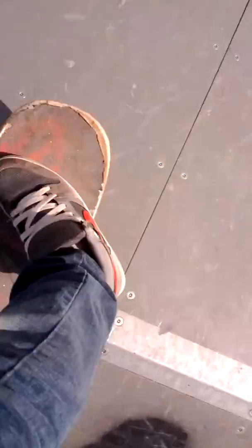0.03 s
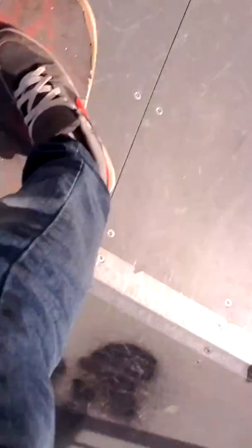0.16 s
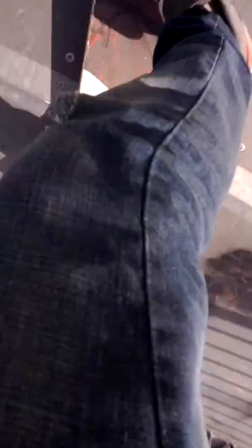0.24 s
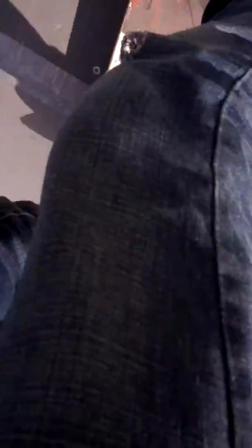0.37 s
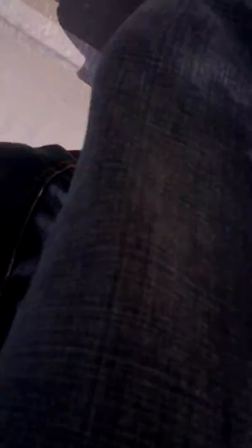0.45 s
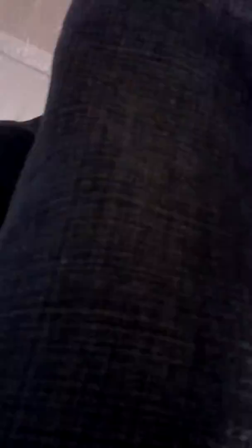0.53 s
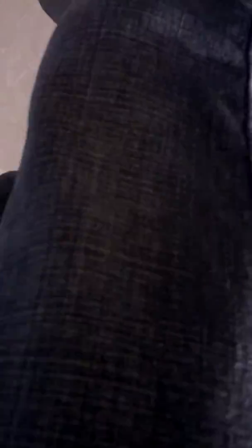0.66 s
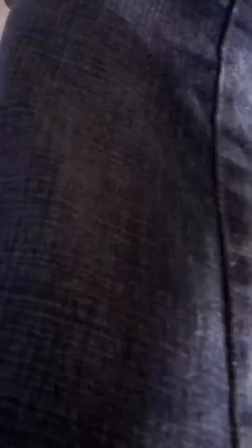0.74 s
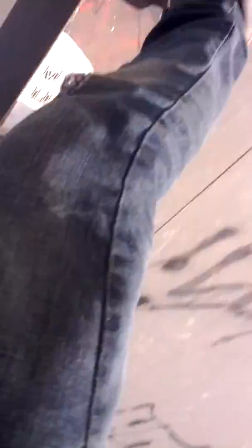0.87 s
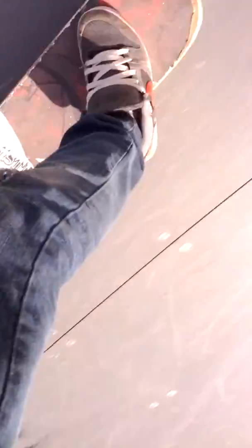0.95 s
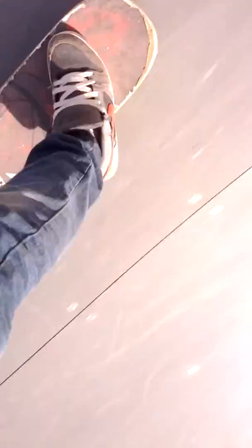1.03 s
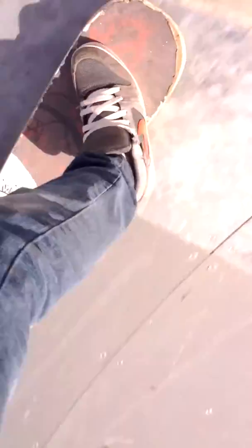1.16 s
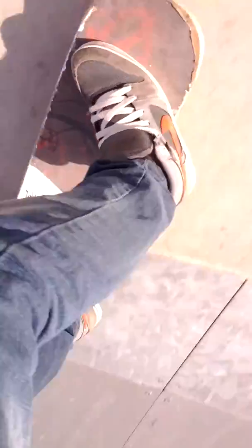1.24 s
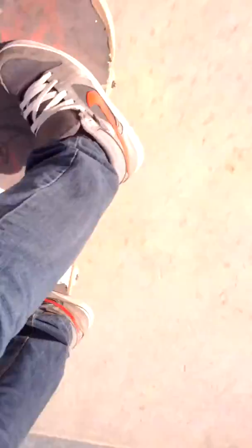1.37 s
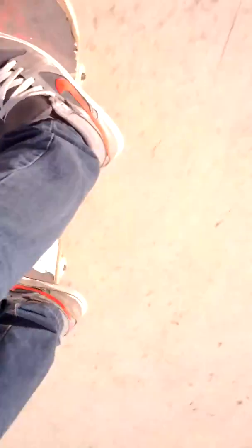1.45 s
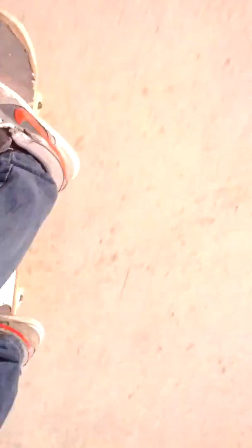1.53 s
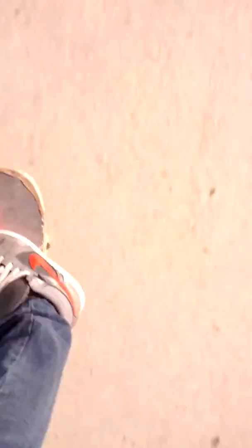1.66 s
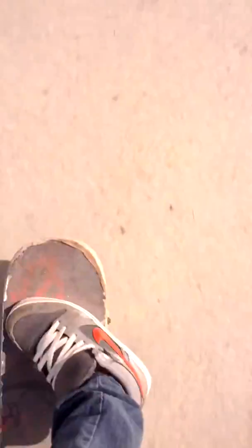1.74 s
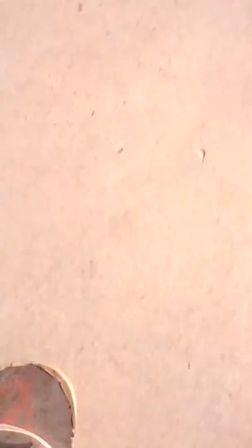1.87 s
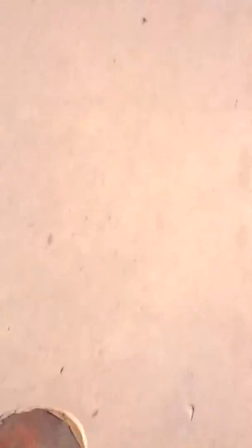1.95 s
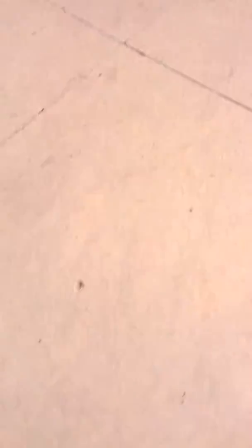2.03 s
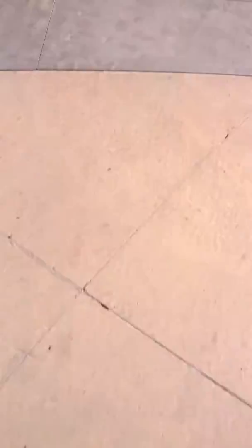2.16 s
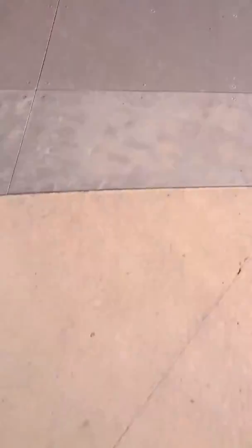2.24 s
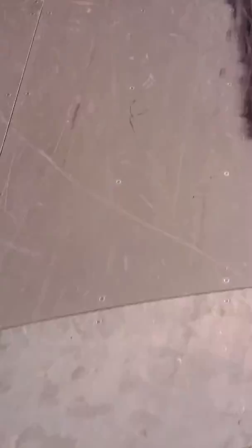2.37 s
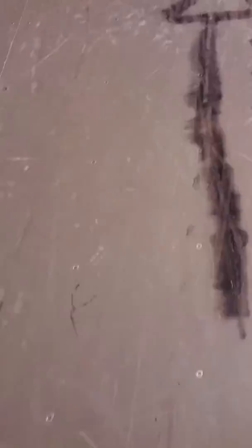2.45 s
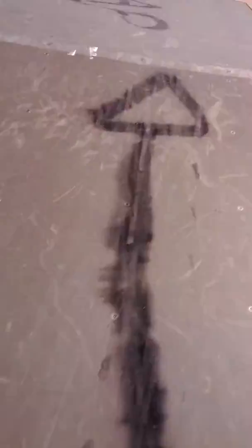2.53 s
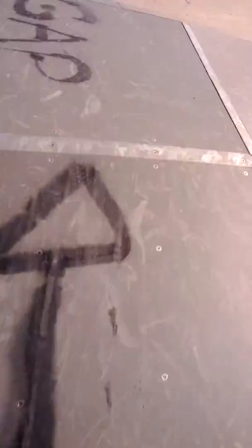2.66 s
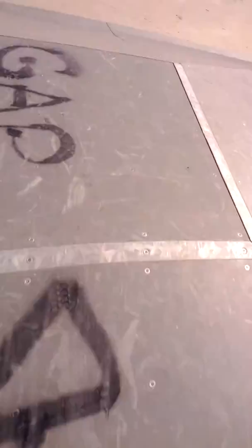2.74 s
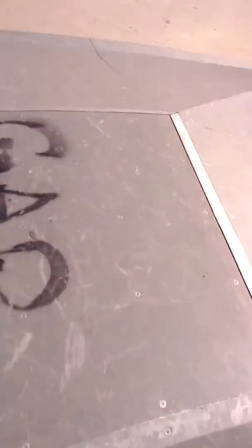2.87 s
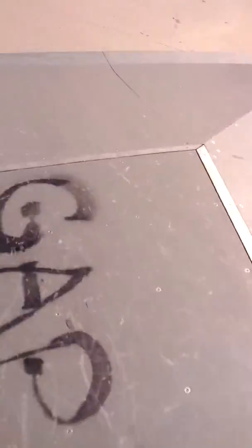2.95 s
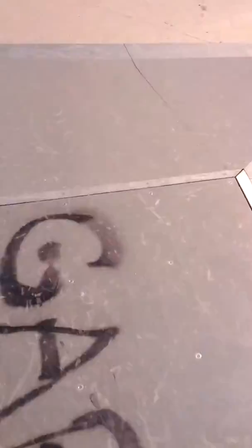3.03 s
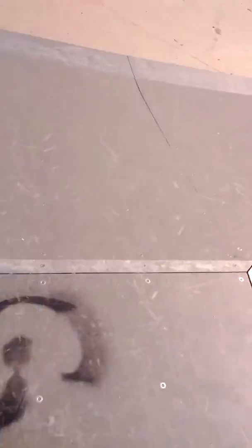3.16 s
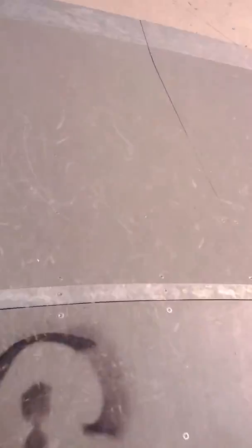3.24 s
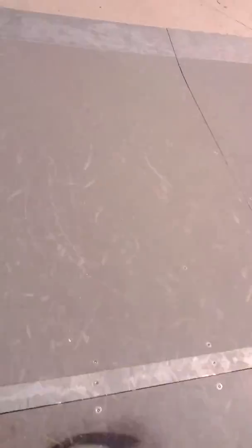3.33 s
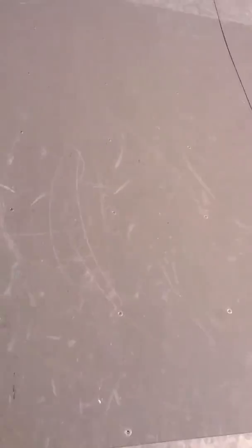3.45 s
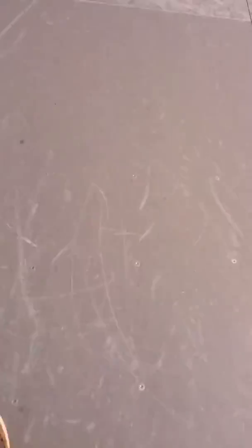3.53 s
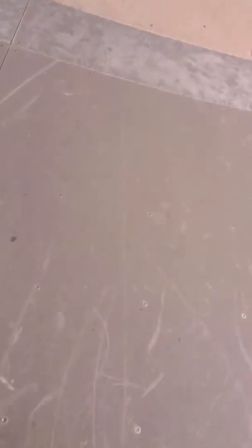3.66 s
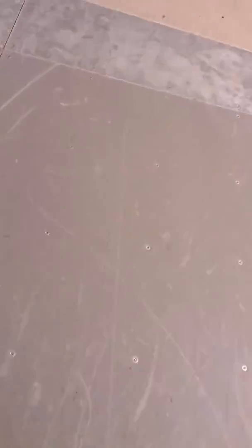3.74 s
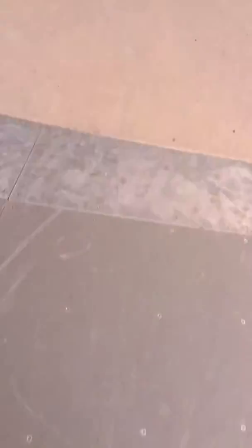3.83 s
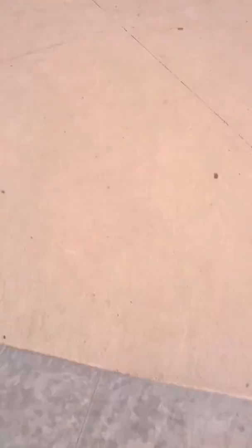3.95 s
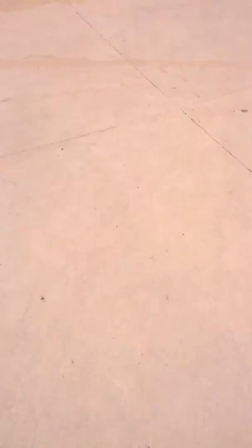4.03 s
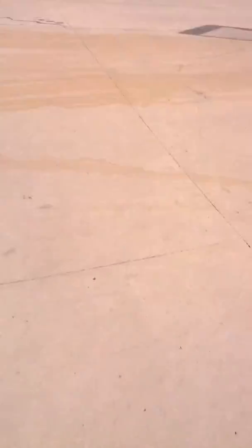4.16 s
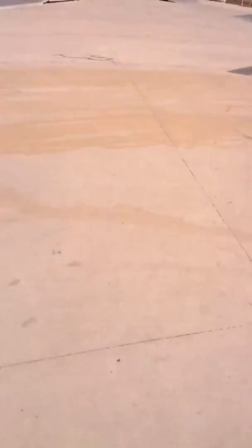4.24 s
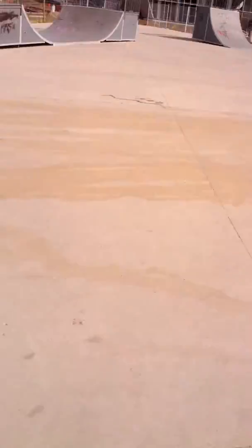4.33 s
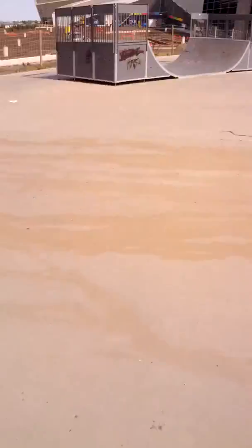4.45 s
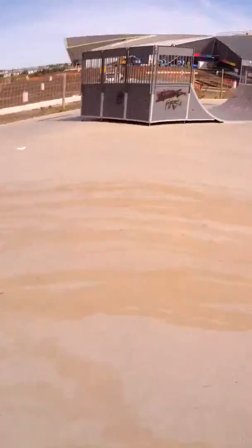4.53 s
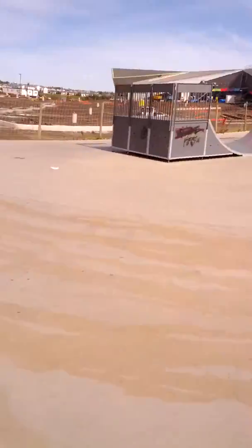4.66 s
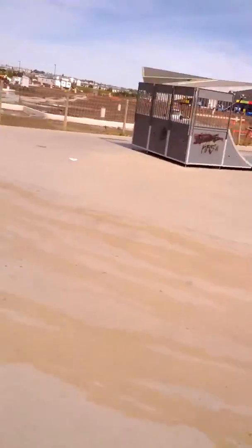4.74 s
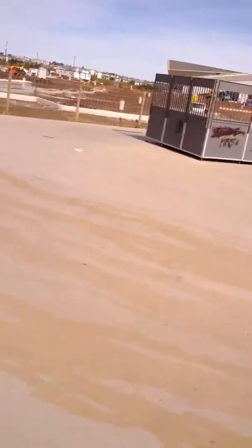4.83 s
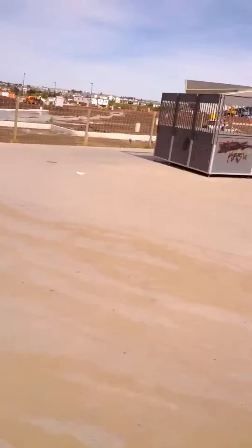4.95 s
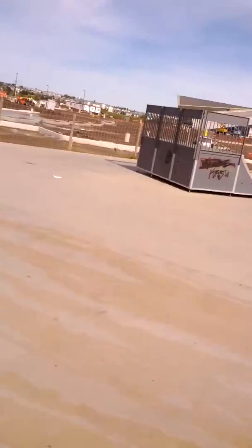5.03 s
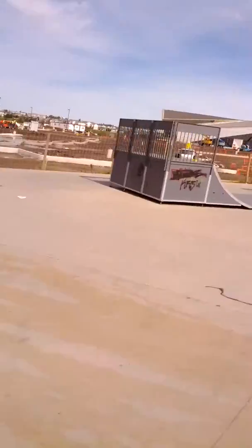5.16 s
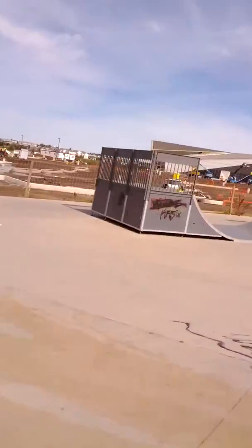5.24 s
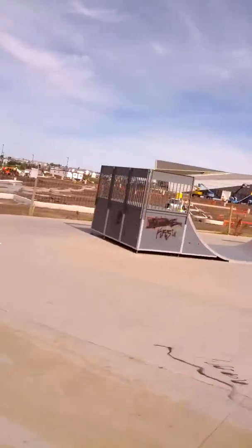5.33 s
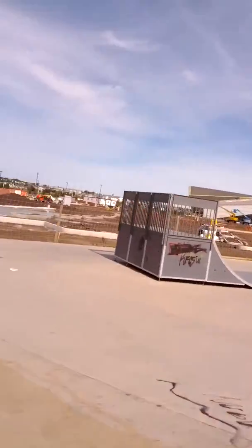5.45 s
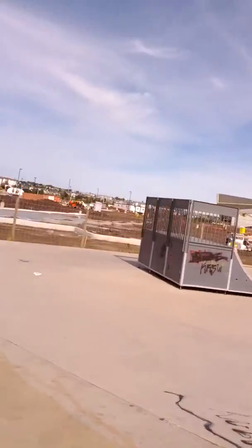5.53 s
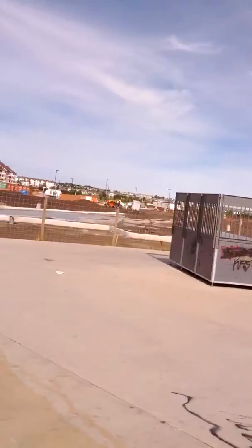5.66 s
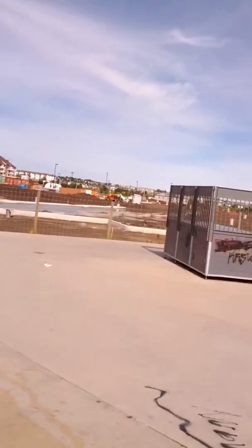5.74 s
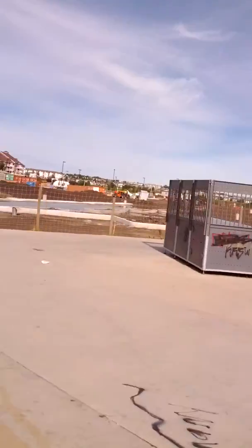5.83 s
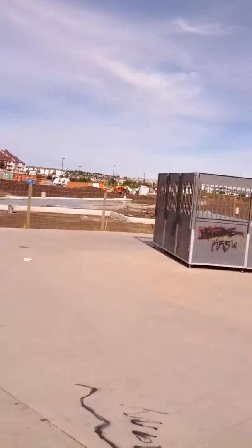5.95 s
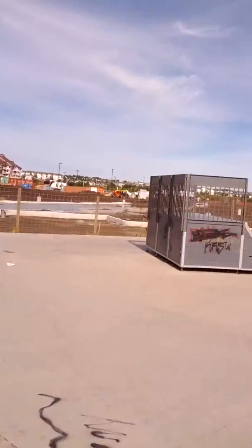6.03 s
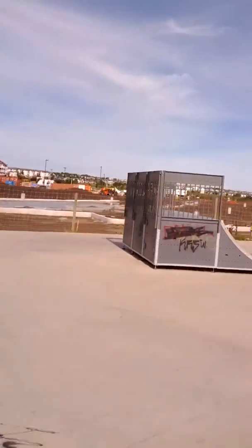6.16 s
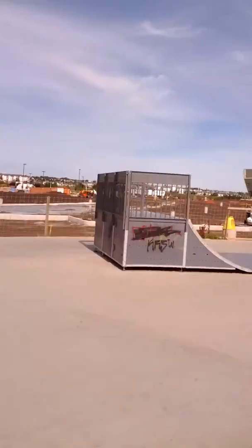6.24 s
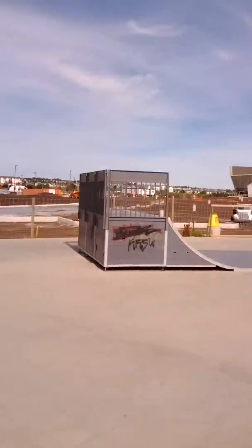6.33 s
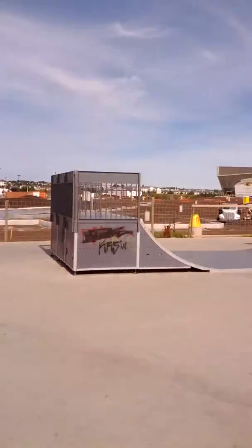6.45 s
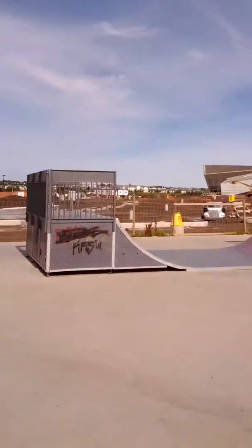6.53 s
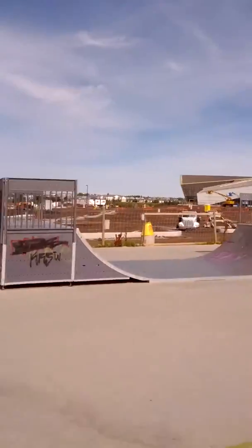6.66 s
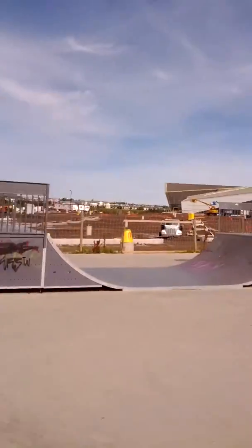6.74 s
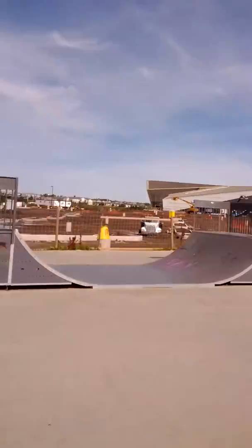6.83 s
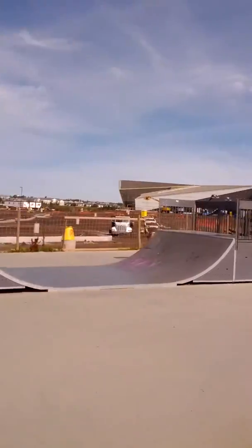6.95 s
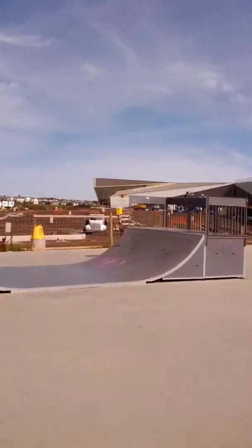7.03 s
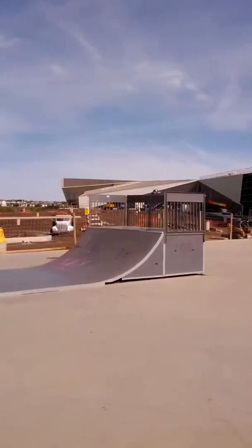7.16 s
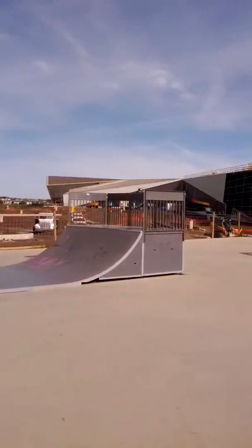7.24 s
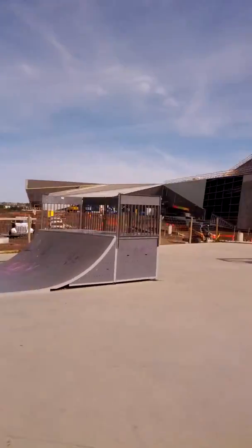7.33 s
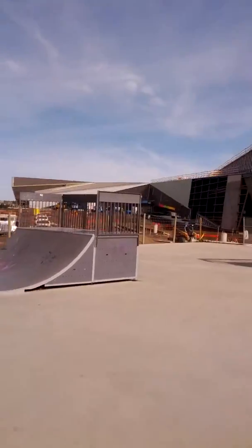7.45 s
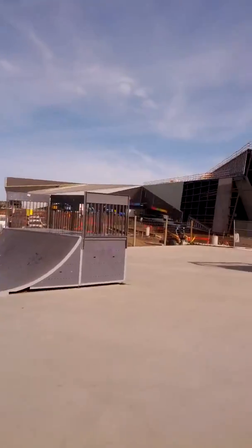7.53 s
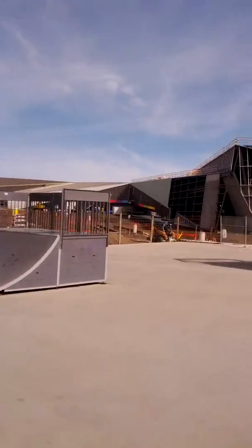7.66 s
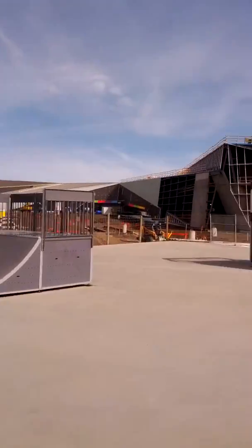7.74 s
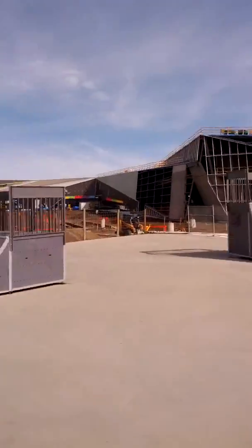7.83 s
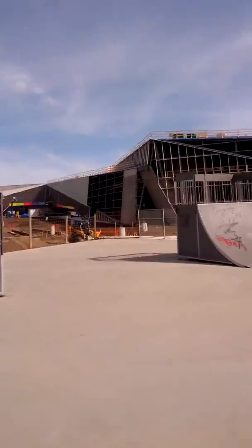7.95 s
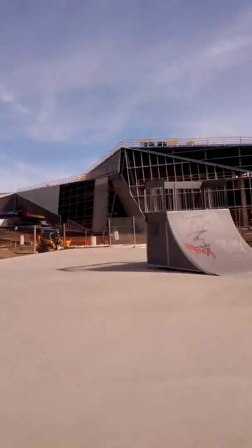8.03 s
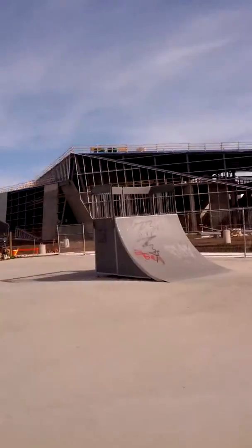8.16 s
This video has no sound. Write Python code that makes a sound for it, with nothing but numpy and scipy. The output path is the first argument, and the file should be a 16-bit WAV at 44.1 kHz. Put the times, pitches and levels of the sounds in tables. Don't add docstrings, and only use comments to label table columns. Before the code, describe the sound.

Close and handheld outdoors, a skateboard starts softly with a shoe scuff, then rumbles and booms down a hollow ramp. Distorted cracks mark its foot, followed by pebbly patter and a bright steel-plate clatter. A lighter box-ramp roll ends in a hard landing; the hiss gradually thins on concrete, broken by small knocks and two late seam clacks.

```python
import sys
import numpy as np
from scipy import signal
from scipy.fft import rfft, irfft
from scipy.io import wavfile
from scipy.ndimage import uniform_filter1d

SR = 44100
rng = np.random.default_rng(int(sys.argv[2]) if len(sys.argv) > 2 else 0)


def field_ratio(decibels):
    return 10 ** (np.asarray(decibels, dtype=float) / 20)


def generate_wav(sig):
    pcm = np.round(np.clip(np.atleast_2d(sig).T, -1, 1) * 32767).astype(np.int16)
    wavfile.write(sys.argv[1], SR, pcm)


N = 361179


def evened(x):
    return x / np.sqrt(np.mean(x ** 2) + 1e-20)


def add(mix, start_s, sound):
    part = mix[round(start_s * SR):][:len(sound)]
    part += sound[:len(part)]


def curves(rows):
    time_s, *columns = np.transpose(rows)
    return [np.interp(np.arange(N) / SR, time_s, column) for column in columns]


def humps(rows):
    t = np.arange(0, N + 64, 64) / SR
    level_db = sum(db * np.exp(-((t - centre_s) / half_s) ** 4) for centre_s, half_s, db in rows)
    return np.interp(np.arange(N) / SR, t, level_db)


def louder(rows, gain_db):
    return [(start_s, level_db + gain_db, *tone) for start_s, level_db, *tone in rows]


def colour(x, points):
    hz = np.fft.rfftfreq(len(x), 1 / SR)
    point_hz, point_db = np.transpose(points)
    gain_db = np.interp(np.log(hz + 1), np.log(point_hz + 1), point_db, -90, -90)
    return evened(irfft(rfft(x) * field_ratio(gain_db), len(x)))


def ring(x, modes):
    out = 0
    for k, (hz, width_hz, level_db) in enumerate(modes):
        b, a = signal.iirpeak(hz, hz / (2.0 * width_hz), SR)
        mode = signal.lfilter(b, a, signal.lfilter(b, a, x))
        out = out + (-1) ** k * field_ratio(level_db) * evened(mode)
    return evened(out)


def wander(seconds):
    width = max(round(seconds * SR), 2)
    return evened(uniform_filter1d(uniform_filter1d(rng.standard_normal(N), width), width))


def blend(share, a, b):
    turn = np.clip(share, 0, 1) * np.pi / 2
    return np.cos(turn) * a + np.sin(turn) * b


def patchy(x, depth_db):
    z = signal.stft(x, nperseg=512)[2]
    chance = uniform_filter1d(rng.standard_normal(z.shape), 7, 0)
    patches = evened(uniform_filter1d(chance, 16, 1))
    return evened(signal.istft(z * field_ratio(depth_db * patches), nperseg=512)[1][:N])


def ground(per_s, spread_db, bumpy_db):
    grains = (rng.random(N) < per_s / SR) * field_ratio(spread_db * np.minimum(rng.exponential(1, N), 4))
    texture = rng.standard_normal(N) * (1 + .5 * evened(grains))
    return evened(texture * field_ratio(bumpy_db * wander(0.0098)))


# time_s, wheel_load_db, roughness_db, hollow_panel_0_1, mic_near_board_0_1
RIDE = [(0, -51, 2.5, 0.1, 0.95), (.29, -47, 4, 0.06, 0.24), (.41, -37, -1, 0.13, 0.4),
        (.66, -28, -1, 0.64, 0.4), (.86, -26.5, 4.5, 0.78, 0.47), (1.19, -24.5, 8.5, 0.7, 0.75),
        (1.46, -21, 0.5, 0.16, 0.88), (1.82, -22.5, 3, 0.25, 0.94), (2.05, -25.5, 3, 0.45, 1),
        (2.44, -28, 9.5, 0.04, 0.55), (2.6, -27.5, 3, 0.76, 1), (2.9, -31.5, 0, 0.7, 1),
        (3.5, -33, -4, 0.55, 0.85), (3.85, -32, -1, 0.5, 0.63), (4.17, -36.5, 9.5, 0.95, 0.52),
        (4.33, -34, 12.5, 0.18, 0.27), (4.7, -34.5, 4.5, 0.23, 0.28), (8.19, -35, 4.5, 0.48, 0.25)]
# centre_s, half_length_s, level_db
ROUGH = [
    (1.91, 0.1, 5),
    (2.1, 0.052, 0.5),
    (4.4, 0.026, 6.5),
    (7.4, 0.28, -1),
    (3, 0.19, -0.5),
    (6.85, 0.24, -3),
    (2.33, 0.16, 0.5),
    (4.39, .055, -7),
    (.8, .15, -1),
]
# centre_s, half_length_s, level_db
LIFTS = [
    (3.073, 0.059, -7.5),
    (3.147, 0.018, -10.5),
    (3.626, 0.092, -5.5),
    (.44, .03, 1.5),
    (2.5, .09, 2.5),
    (.2, .1, -2),
    (3.11, .012, -6),
]
# pitch_hz, width_hz, level_db
DECK_CONCRETE = [(283.3, 42.5, -4.5), (326, 70, -2.5), (560, 116, 1), (727, 88, -3), (1071, 24, -15.5)]
DECK_RAMP = [(184.4, 41, -3), (279, 91, 0.5), (352, 64, -7), (500, 188, 1), (794, 52, -13.5),
             (920, 160, -13)]
# pitch_hz, width_hz, level_db
WHEEL_FAR = [(1282, 160, 3), (1682, 104, -1), (1930, 490, -10.5), (2545, 260, -11), (3160, 190, -17.5),
             (4400, 1500, -22.5)]
WHEEL_NEAR = [(903, 104, 5.5), (1182, 18, -6.5), (1445, 79, 4), (1660, 800, -0.5), (2144, 520, -0.5),
              (2575, 290, -7), (3320, 680, -19)]
WHEEL_PANEL = [(1213, 58, 0), (1533, 137, 2), (1570, 350, -4.5), (2630, 160, -13.5)]
# pitch_hz, level_db_per_hz
GRIT_FAR = [(2060, -4.5), (3800, -5), (5140, -15), (7900, -18), (11300, -16.5), (12900, -23), (15500, -13),
            (16200, -24)]
GRIT_NEAR = [(2060, -0.5), (3500, -1), (4500, -9), (9330, -11.5), (10900, -8.5), (13700, -11.5),
             (15100, -6), (16200, -13)]
# pitch_hz, level_db
SHADING = [(4300, 0), (4950, 4), (5250, 0.5), (7400, 1), (7900, -1), (11700, 0), (12100, -1.5), (14200, -2)]


def rolling():
    load_db, rough_db, hollow, near = curves(RIDE)
    cruise_db, coast_db_per_s, coast_start_s = -34.5, -1.55, 4.7
    coast_db = coast_db_per_s * np.maximum(np.arange(N) / SR - coast_start_s, 0)
    lift_db = humps(LIFTS)
    grit_db = -53 + 0.99 * (load_db - cruise_db) + 0.84 * rough_db + 9.5 * (near - .2) + coast_db
    low, mid, high = ground(400, 0.82, 0.91), ground(600, 1.8, 0.57), ground(500, 0.71, 0.16)
    deck = blend(hollow, ring(low, DECK_CONCRETE), ring(ground(200, 2.0, 2.1), DECK_RAMP))
    wheel = blend(near, ring(mid, WHEEL_FAR), ring(mid[::-1], WHEEL_NEAR))
    wheel = blend(hollow ** 2, wheel, ring(np.roll(mid, SR), WHEEL_PANEL))
    wheel = patchy(wheel, 1.35)
    grit = patchy(blend(near, colour(high, GRIT_FAR), colour(high[::-1], GRIT_NEAR)), 1.44)
    grit = colour(grit, [(1000, 0)] + SHADING + [(17000, 0)])
    out = field_ratio(load_db + rough_db + humps(ROUGH)) * deck
    out += field_ratio(load_db - 1.5 + 1.04 * lift_db) * wheel
    return out + field_ratio(grit_db + lift_db) * grit


# centre_s, half_length_s, level_db
GUSTS = [(.25, 0.098, -4), (.07, 0.087, -6), (.8, 0.2, 11.5), (1.15, 0.13, 15), (1.6, 0.41, 5.5),
         (2.2, 0.37, -3), (2.55, 0.13, 8), (2.99, 0.18, 3), (3.45, 0.2, 4.5), (3.65, 0.093, -5),
         (3.88, 0.17, 5.5), (4.15, 0.026, 12.5), (4.7, 0.58, 4.5), (5.6, 0.18, 4), (5.82, 0.13, 8),
         (6.3, 0.12, 7.5), (6.65, 0.052, -6), (7.14, 0.063, 9), (7.9, 0.105, 4.5)]
# pitch_hz, level_db_per_hz
BUFFET = [(8.8, -31), (15, -3.5), (48, 4), (113, -1), (200, -10), (260, -7.5), (340, -47), (570, -120)]


def wind():
    wind_db = -34 + humps(GUSTS) + 0.81 * wander(0.035)
    return field_ratio(wind_db) * colour(rng.standard_normal(N), BUFFET)


# start_s, level_db, pitch_hz, t60_s
BOOMS = [(0.054, -13, 61.4, 0.036), (0.655, -9.5, 155, 0.039), (0.711, -12.5, 156.6, 0.2),
         (0.753, -11, 119, 0.11), (0.791, -10, 139.6, 0.11), (0.891, -12, 130, 0.11),
         (1.122, -3, 157, 0.29), (1.201, -14, 130.3, 0.46), (2.511, -23, 118, 0.82),
         (2.979, -18, 114.7, 0.36), (3.13, -40, 117, 0.24), (3.496, -17, 117, 0.13)]


def booms():
    out, t = np.zeros(N), np.arange(SR // 2) / SR
    for start_s, level_db, pitch_hz, t60_s in BOOMS:
        add(out, start_s, field_ratio(level_db - 60 * t / t60_s) * np.sin(2 * np.pi * pitch_hz * t))
    return out


# centre_s, length_s, level_db
SHUFFLES = [
    (.06, 0.026, -61),
    (0.212, .02, -55.5),
    (.295, .008, -58),
]
# pitch_hz, level_db_per_hz
SHUFFLE_COLOUR = [(4000, -10), (5500, -5), (9000, -9), (13500, 0), (16500, 0)]


def shuffles():
    t = np.arange(N) / SR
    swell = sum(field_ratio(level_db) * np.exp(-((t - centre_s) / length_s) ** 2)
                for centre_s, length_s, level_db in SHUFFLES)
    return swell * colour(ground(300, 3.5, 2.5), SHUFFLE_COLOUR)


# start_s, level_db, mid_over_level_db, brightness_db_per_octave
TICKS = [(0.309, -31, 5, 8), (.3361, -45, -2, -3), (.363, -45, -3, -8), (1.088, -15, 3, -4),
         (1.122, -7, 4, 4), (1.1367, -10, 6, -1), (1.224, -15, -9, -11), (1.238, -19, 0, -8),
         (1.541, -23.5, 2, -7), (1.569, -19, 4, -8), (2.0917, -15, -17, 0), (2.2404, -19.5, -7, 2),
         (2.4423, -9, -6, 7), (2.454, -11, -2, 5), (2.4784, -27, -3, -3), (2.5016, -16, -16, 7),
         (2.5927, -24, -2, -1), (2.9352, -25.5, 11, 4), (2.9714, -15, 3.5, 4), (3.123, -33.5, 12, 4),
         (3.258, -15, -28, 1), (3.724, -19.5, 3.5, 12), (4.133, -26, -2, 6), (4.1497, -19, 6, 3),
         (4.4942, -12, -26, -4), (5.0133, -39, 12, -11), (5.241, -36, 9, -25), (5.7948, -45, 19, -9),
         (6.636, -26.5, 16, -3), (6.6519, -36, 0, -11)]
BOLT_TICKS = [(0.3991, -48, 0, -2), (0.4385, -51, 0, -2), (1.0678, -24, 0, -2), (1.1468, -29, 0, -8),
              (1.1804, -10, 0, -2), (1.1861, -10, 0, -2), (1.2016, -10, 8, -2), (1.2139, -27, 0, -5),
              (1.253, -8.5, 5, -4), (1.262, -26, 0, -2), (3.4666, -46, 0, -2), (3.4736, -36, 3, 1),
              (3.4828, -42, 0, -2), (3.498, -29.5, 4, -3), (3.5033, -35, 0, -2), (3.6885, -23, -4, -4),
              (3.698, -37, -2, -2), (3.706, -27, -2, 0), (3.711, -29, -2, 0), (3.7348, -33, 0, -2),
              (3.7492, -45, 0, -2), (3.7598, -40, 0, -2), (4.2207, -31, 0, -2), (4.2298, -29, 0, -2),
              (4.2357, -27, 0, -2), (4.2478, -25, 0, -5), (4.2612, -30, 0, -2), (4.2717, -38, 0, -2),
              (5.8228, -44, 0, -6)]
PLATE_TICKS = [(2.4298, -10, -10, -1), (2.4361, -20, -8, 3), (2.4628, -36, -8, 3), (2.4689, -31, -8, 3),
               (2.4897, -30, -8, 3), (2.521, -15, -10, 5), (2.526, -11, -8, 4), (2.531, -8, -5, 6),
               (2.5376, -9, -5, 4), (2.5446, -19, -6, 3), (2.551, -23, -10, 3), (2.5589, -26, -8, 3),
               (2.5652, -34, -8, 3), (2.5812, -27, -8, 3), (2.6032, -34, -8, 3)]
# pitch_hz, level_db_per_hz
CLATTER = [(2200, -9), (3600, -10), (5200, -1), (10000, 0.5), (15300, 1), (16500, 8)]


def ticks():
    tick_t60_s, plate_db, snap_db, snap_s = 0.0125, 1.5, 5, 0.00032
    out, t = np.zeros(N), np.arange(2048) / SR
    rows = chatter() + TICKS + BOLT_TICKS + louder(PLATE_TICKS, plate_db)
    clicks = [(*row, tick_t60_s * field_ratio(0.3 * min(row[2], 0)), 0.079) for row in rows]
    clicks += scrapes()
    noise = rng.standard_normal((len(clicks), 2, 2048))
    mid_band = signal.butter(2, [1500, 4000], "bandpass", fs=SR, output="sos")
    for (start_s, level_db, mid_db, bright_db, t60_s, rise), (a, b) in zip(clicks, noise):
        if level_db < -90:
            continue
        tilted = [(hz, db + bright_db * np.clip(np.log2(hz / 9000), -1.2, .8)) for hz, db in CLATTER]
        burst = field_ratio(level_db + 5.0) * colour(a, tilted)
        burst += field_ratio(level_db + mid_db - 5.0) * evened(signal.sosfilt(mid_band, b))
        decay = field_ratio(snap_db * np.exp(-t / snap_s) - 60 * t / t60_s)
        add(out, start_s, burst * decay * (1 - np.exp(-t / (rise * t60_s))))
    return out


# start_s, length_s, level_db, mid_over_level_db, brightness_db_per_octave
RATTLES = [(.3776, .004, -42, -5, -8), (0.387, 0.0092, -37.5, 1, -20), (1.126, 0.012, -6, 2, 0.5),
           (1.176, 0.008, -13, 12, -10), (1.192, 0.011, -10, 4, 1), (1.2505, 0.005, -13, 9, -6),
           (1.898, .03, -33, -10, -8), (1.932, 0.016, -21, -10, -7), (2.004, 0.019, -22, -8, -3),
           (2.297, 0.046, -27, -12, 2), (1.971, 0.01, -19, -13, -5), (2.157, 0.014, -23, -11, 3),
           (2.201, 0.007, -19, -15, 5), (2.424, 0.013, -5.5, 5.5, 3.5), (2.509, 0.014, -3.5, 2, 2),
           (2.513, 0.0054, -3, -7, 11), (2.958, .01, -28, 5, 5), (3.162, 0.014, -29, 4, -6),
           (3.48, .02, -40, 5, 2), (3.69, 0.023, -27.5, 12, -9), (4.155, 0.024, -27, 9.5, 6),
           (4.211, 0.033, -28, 7, -2), (4.245, 0.022, -27, 12, -3), (4.306, 0.012, -22, 11.5, -2),
           (4.501, 0.012, -28, 0, 11), (6.494, 0.022, -34.5, 6, -2), (6.622, .006, -23, 9, -14)]


def chatter(count=12):
    gap_s, fade_db, spread_db = 0.0042, -3, 9.5
    luck = rng.random((len(RATTLES), 2, count))
    rows = []
    for (start_s, length_s, peak_db, mid_db, bright_db), (gaps, sizes) in zip(RATTLES, luck):
        after_s = gap_s * np.append(0, np.cumsum(.5 + gaps[1:]))
        level_db = peak_db + fade_db * (after_s / length_s) ** 5.9 - spread_db * sizes * (after_s > 0)
        level_db = np.maximum(level_db, -120)
        rows += [(start_s + a, db, mid_db, bright_db) for a, db in zip(after_s, level_db)]
    return rows


def scrapes():
    scrape_db, t60_per_length, rise_share = -10, 2.1, .15
    return [(start_s, level_db + scrape_db, mid_db, bright_db, min(t60_per_length * length_s, .07), rise_share)
            for start_s, length_s, level_db, mid_db, bright_db in RATTLES]


# ratio_to_ring, level_db
KNOCK_MODES = [(.4, -6), (0.629, -5), (1, 4), (1.621, -6), (2.35, -13), (3.8, -33)]


def knocks(rows):
    out, t = np.zeros(N), np.arange(3000) / SR
    chance = rng.random((len(rows), len(KNOCK_MODES)))
    crunch_band = signal.butter(2, [250, 1800], "bandpass", fs=SR, output="sos")
    crunches = signal.sosfilt(crunch_band, rng.standard_normal((len(rows), 3000)))
    ratios, mode_db = np.transpose(KNOCK_MODES)
    for (start_s, level_db, pitch_hz, t60_s), luck, crunch in zip(rows, chance, crunches):
        detune = np.where(ratios == 1, 1, 0.863 + 0.23 * luck)
        modes = sum(field_ratio(db) * np.sin(2 * np.pi * hz * t) for hz, db in zip(pitch_hz * ratios * detune, mode_db))
        body = modes + field_ratio(-16.5) * evened(crunch)
        swell = 1 - np.exp(-t / (0.049 * t60_s))
        choke_db = -60 * (t / (0.39 * t60_s)) ** 1.725
        add(out, start_s, field_ratio(level_db + 3.0 + choke_db) * body * swell)
    return out


# start_s, level_db, pitch_hz, t60_s
EXTRA_KNOCKS = [(0.309, -29, 920, 0.019), (.337, -29.5, 704, 0.033), (0.728, -10, 258, 0.048),
                (0.775, -11, 252, 0.057), (0.926, -19, 260, 0.026), (1.102, -11, 225, 0.079),
                (1.143, -3, 250, 0.035), (1.155, -9, 217, 0.073), (1.203, -3.5, 240, 0.039),
                (1.402, -31, 260, 0.035), (1.57, -9, 560, 0.037), (2.35, -16, 560, 0.13), (2.465, -6, 293, 0.034),
                (2.972, -12, 920, 0.044), (3.128, -20, 400, 0.02), (3.4727, -22, 2020, 0.015),
                (4.145, -18, 313, 0.018), (4.232, -10.5, 302, 0.052), (4.397, -14, 576, 0.022),
                (4.912, -24.5, 630, .03), (5.96, -33, 615, 0.015), (6.499, -24, 333, 0.025),
                (6.506, -19, 320, 0.089), (6.624, -13, 330, 0.023), (6.634, -12.5, 350, 0.039),
                (4.306, -21, 2680, .02)]
SHUDDERS = [(.62, -20, 190, .04), (.677, -15, 170, .045), (.694, -19, 200, .04), (.7535, -8, 150, .045),
            (.7725, -10, 190, .04), (.788, -8, 170, .04), (.7975, -8, 200, .04), (.806, -13, 170, .04),
            (.845, -16, 200, .04), (.864, -9, 170, .045), (.894, -9, 150, .05), (.929, -10, 180, .045),
            (.945, -14, 170, .04), (.963, -11, 160, .045), (.99, -12, 150, .045)]
KNOCKS = [(0.6574, -10.5, 328, 0.024), (0.7155, -9, 324, 0.028), (0.764, -13, 376, 0.026),
          (0.7955, -11.5, 327, 0.054), (0.8154, -7, 520, 0.017), (0.866, -15, 270, 0.029),
          (1.0127, -4, 492, 0.048), (1.0658, 3, 534, 0.03), (1.0854, -4, 560, 0.042),
          (1.1748, 2, 626, 0.028), (1.1815, 0, 950, 0.025), (1.1886, 0, 937, 0.055),
          (1.8565, -13, 580, 0.049), (1.981, -8.5, 362, 0.047), (2.257, -9.5, 540, 0.044),
          (2.3378, -14, 560, 0.028), (2.38, -9, 550, 0.046), (2.4236, 0, 560, 0.047),
          (2.4962, -8, 764, 0.018), (2.513, -3, 320, 0.022), (2.5774, -11, 786, 0.027),
          (2.942, -10.5, 482, 0.024), (2.9673, -12.5, 575, 0.036), (3.1717, -17, 318, 0.034),
          (3.4753, -22, 960, 0.022), (3.4924, -16.5, 622, 0.016), (3.4993, -16, 497, 0.012),
          (3.762, -26, 900, 0.034), (4.2113, -0.5, 614, 0.031), (4.2204, -1, 624, 0.027),
          (4.228, -5, 580, 0.033), (4.237, -11, 560, 0.029), (4.3055, -7.5, 700, 0.023),
          (4.3128, -7, 805, 0.02), (4.309, -11, 500, 0.029), (4.124, -15, 480, 0.067),
          (4.277, -18.5, 457, 0.12), (4.505, -22, 538, 0.1), (5.758, -22.5, 510, 0.052)]
NUDGES = [(0.901, -9, 592, 0.04), (0.956, -8, 546, 0.04), (4.342, -16, 606, 0.04), (4.356, -15, 463, 0.04),
          (4.37, -16, 495, 0.04), (4.411, -17, 614, 0.04), (4.424, -18, 619, 0.04), (4.436, -16, 600, 0.04),
          (4.458, -23, 690, 0.049), (4.53, -18, 680, 0.036), (4.7, -24, 670, 0.044),
          (5.118, -17, 600, 0.04), (5.247, -21, 573, 0.04), (5.345, -26, 577, 0.047),
          (5.801, -17.5, 573, 0.047), (6.115, -21, 620, 0.04), (6.438, -20, 614, 0.051),
          (7.339, -19, 540, 0.036), (7.611, -21, 544, 0.04)]
PATS = [(1.321, -21, 550, 0.036), (1.432, -15, 690, 0.077), (1.513, -9, 505, 0.044),
        (1.629, -12.5, 573, 0.031), (1.69, -13, 570, 0.044), (1.749, -9.5, 530, 0.031),
        (1.84, -11.5, 560, 0.047), (1.865, -13, 600, 0.028), (1.895, -4, 540, 0.043),
        (1.911, -10.5, 555, 0.065), (1.933, -2, 365, 0.033), (2.031, -20, 554, 0.04),
        (2.058, -19, 624, 0.048), (2.131, -26, 619, 0.034), (2.161, -14, 511, 0.043),
        (2.227, -15, 530, 0.036), (2.283, -10, 573, 0.031), (2.394, -15, 600, 0.035)]


def blows():
    rows = EXTRA_KNOCKS + louder(SHUDDERS, -3) + KNOCKS
    return rows + louder(NUDGES, -6.5) + rebounds() + louder(PATS, -3.5)


# start_s, level_db, pitch_hz, rebound_gap_s, first_rebound_loss_db
SEAMS = [
    (1.118, 6, 568, 0.016, -6),
    (1.2517, 10.5, 900, .0094, -14),
    (3.7044, -10, 750, 0.015, -4),
    (4.1335, -4, 572, 0.0074, -4),
    (6.496, -1, 610, 0.0108, -3.5),
    (6.6238, -3.5, 713, 0.011, -6),
]


def rebounds(count=4):
    cycles, steepen, detune = 21, 2.1, 0.13
    luck = rng.uniform(-1, 1, (len(SEAMS), count))
    rows = []
    for (start_s, level_db, pitch_hz, gap_s, loss_db), u in zip(SEAMS, luck):
        for k in range(count):
            ring_hz = pitch_hz * (1 + detune * u[k] * (k > 0))
            rows.append((start_s + k * gap_s, level_db + loss_db * k ** steepen, ring_hz, cycles / pitch_hz))
    return rows


def scene():
    steady = rolling() + wind() + booms() + shuffles()
    hits = ticks() - knocks(blows())
    bounce = field_ratio(-20.0) * np.roll(hits, 260)
    return (steady + hits + bounce)[None]


def top_cut(x):
    return signal.sosfilt(signal.butter(12, 16950, fs=SR, output="sos"), x)


def record(dry):
    ceiling, knee = .72, 9.
    clipped = dry / (1 + abs(dry / ceiling) ** knee) ** (1 / knee)
    edge_hz = [0, 15680, 15950, 16300, 16700, SR / 2]
    edge = signal.firwin2(601, edge_hz, [1, 1, .005, .05, 0, 0], fs=SR)
    return top_cut(signal.oaconvolve(clipped, edge[None], "same"))


dry = scene()
out = record(dry)
generate_wav(out)
```